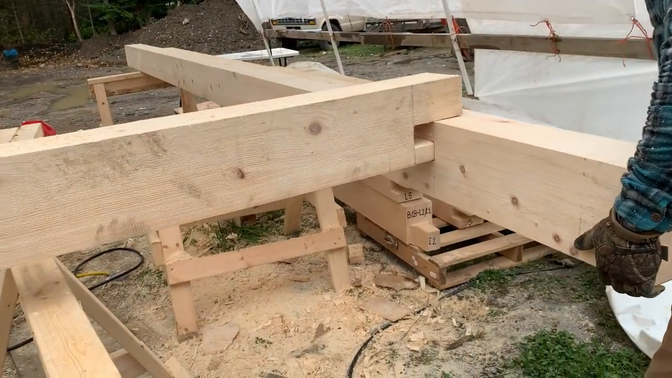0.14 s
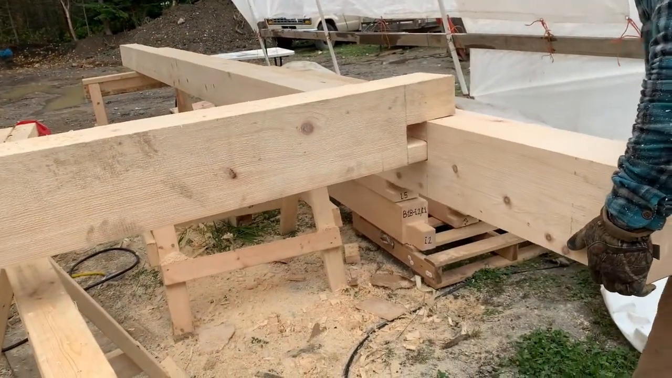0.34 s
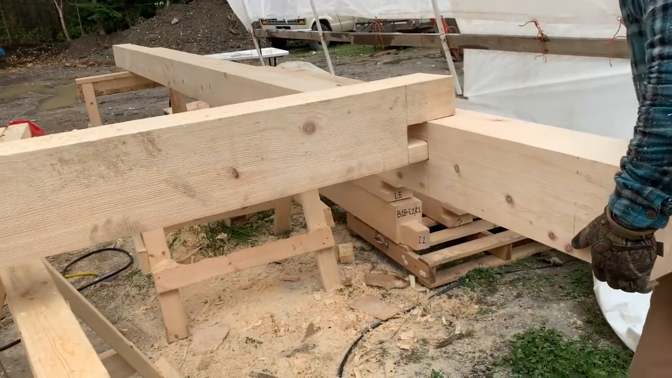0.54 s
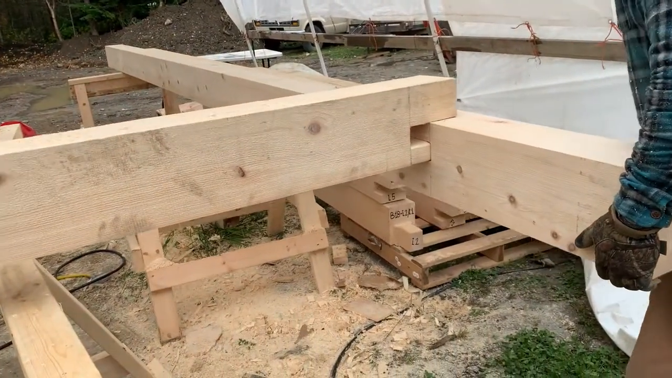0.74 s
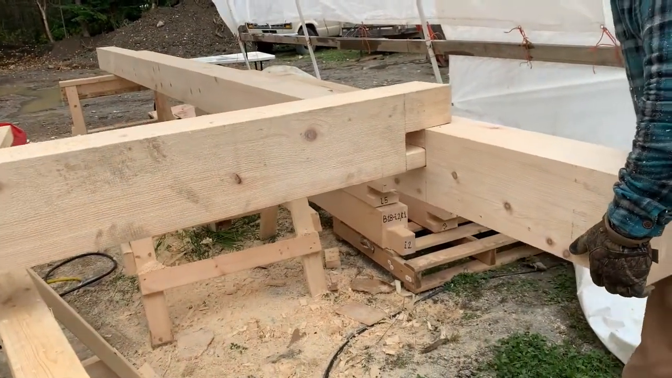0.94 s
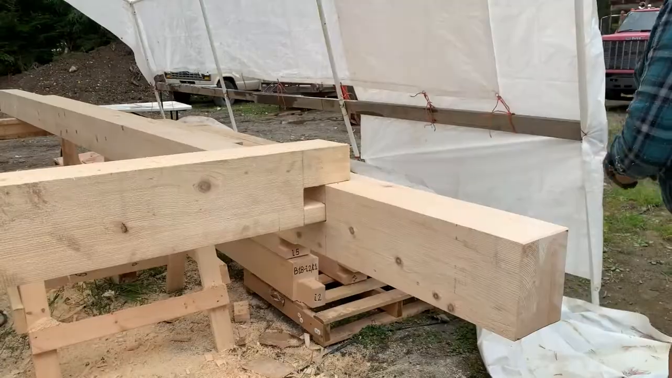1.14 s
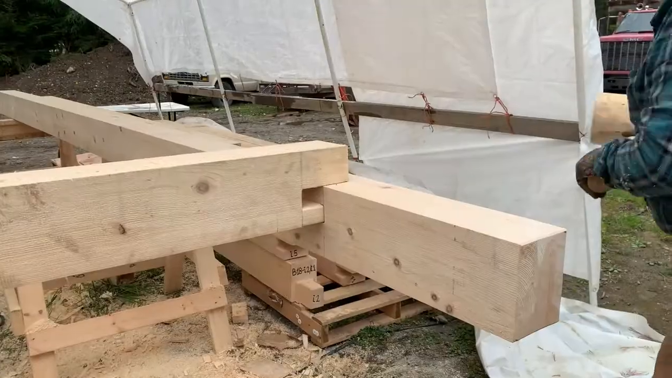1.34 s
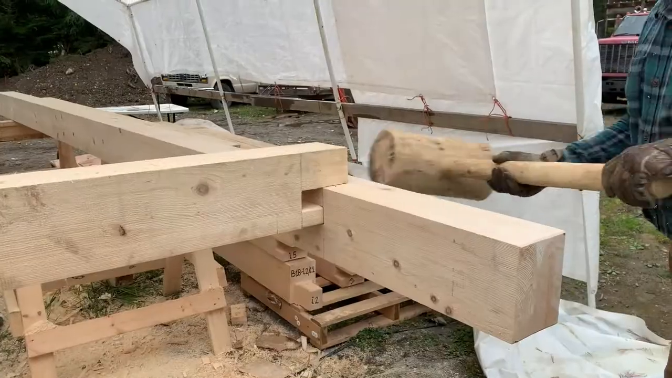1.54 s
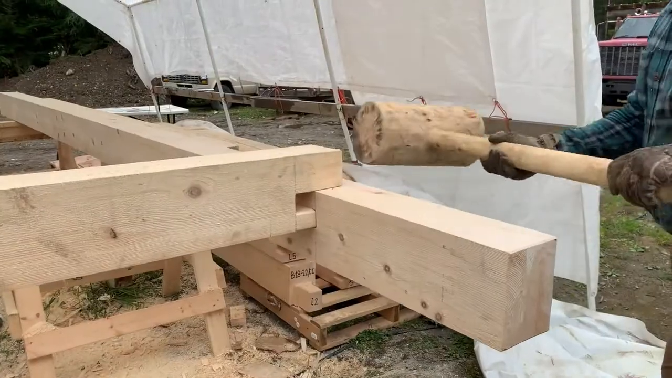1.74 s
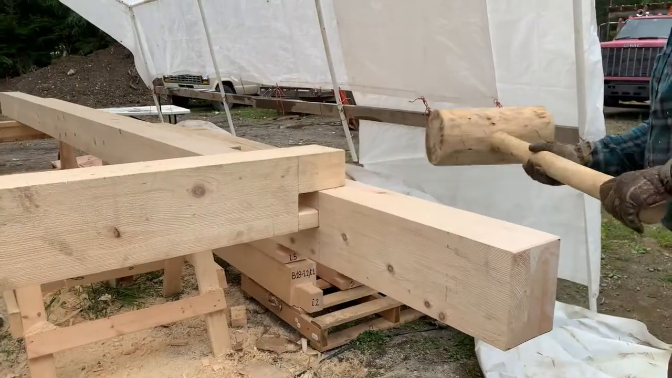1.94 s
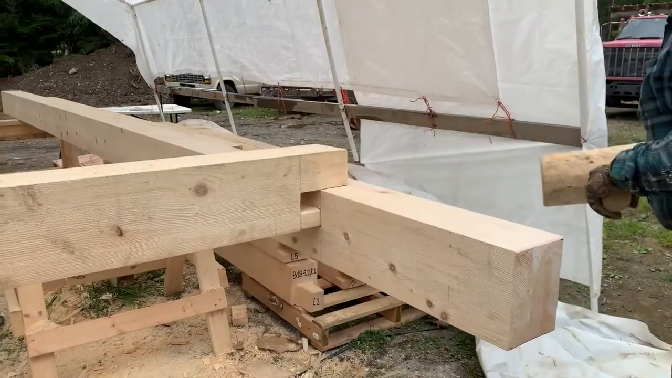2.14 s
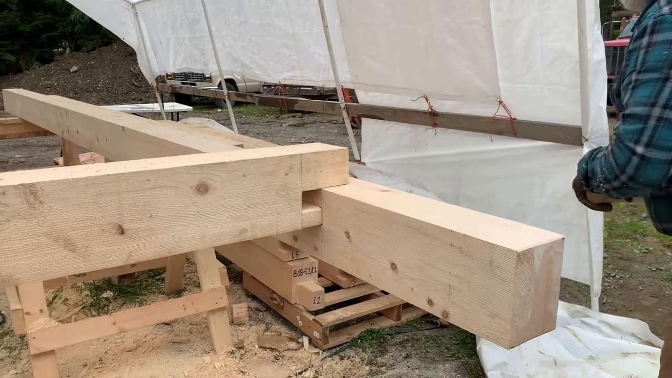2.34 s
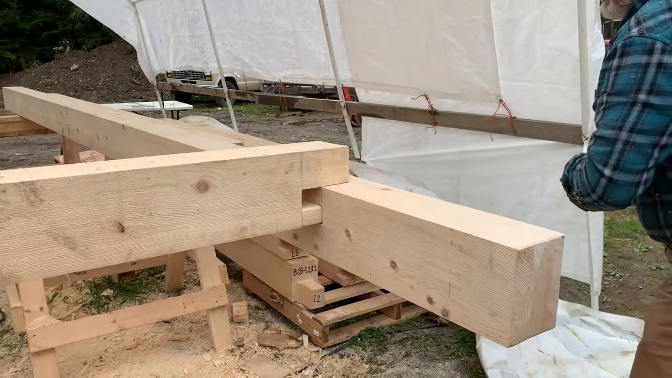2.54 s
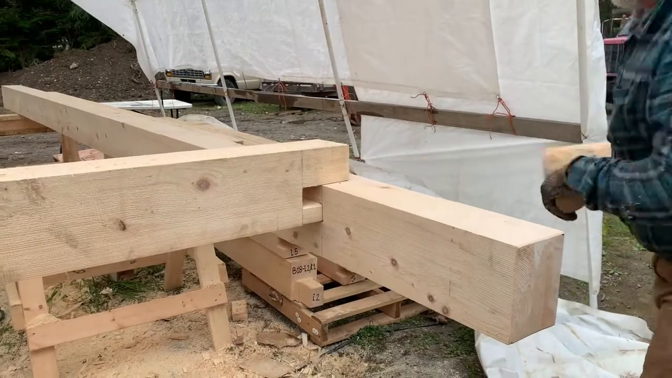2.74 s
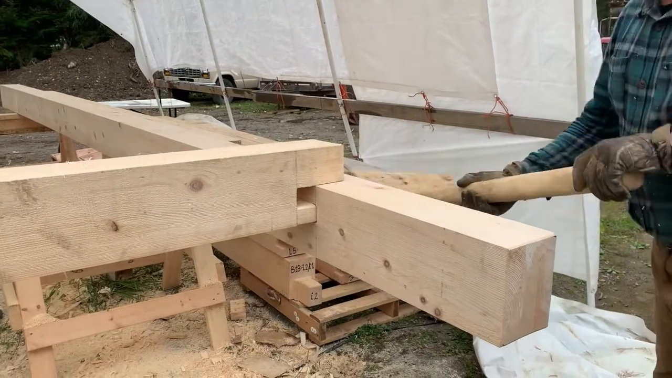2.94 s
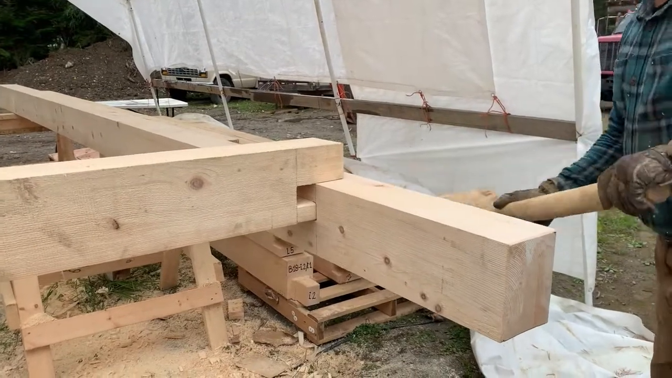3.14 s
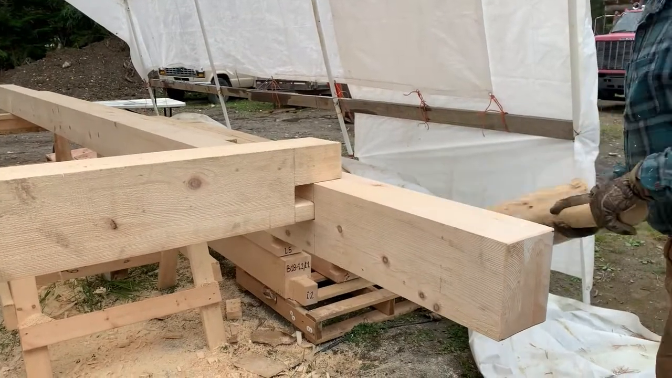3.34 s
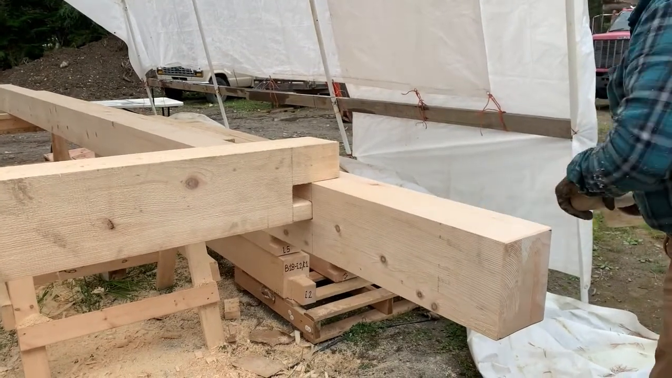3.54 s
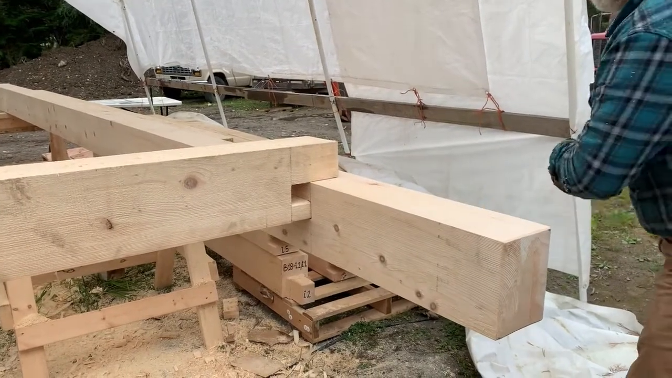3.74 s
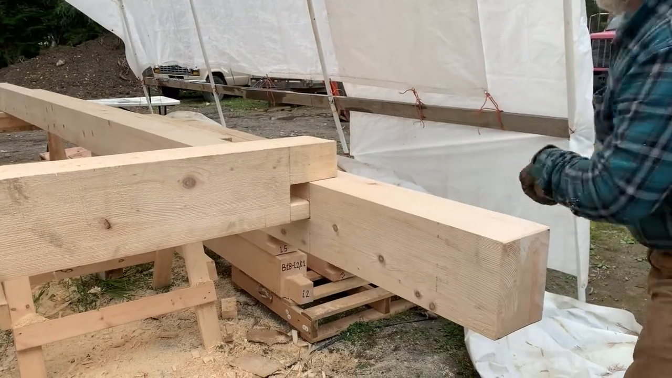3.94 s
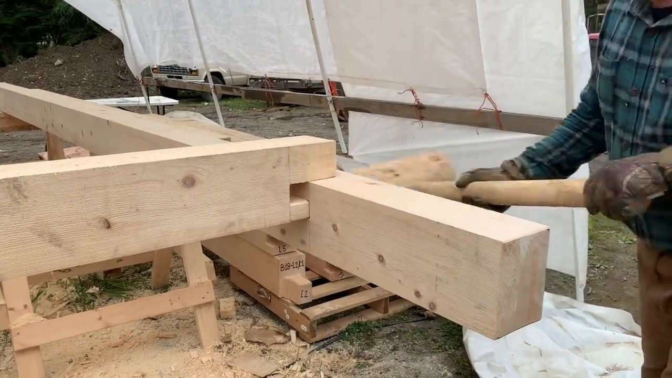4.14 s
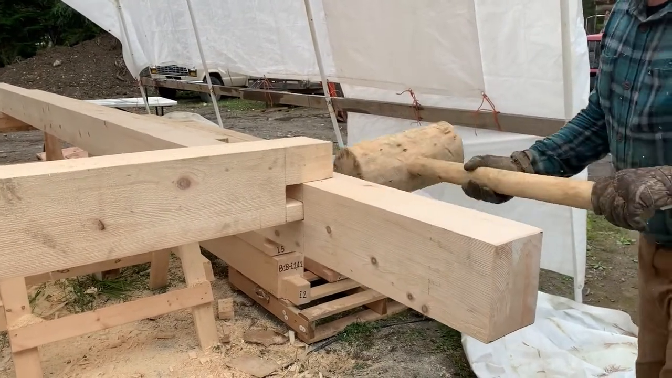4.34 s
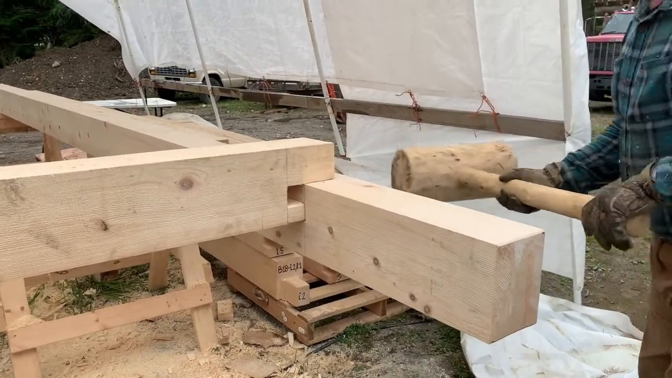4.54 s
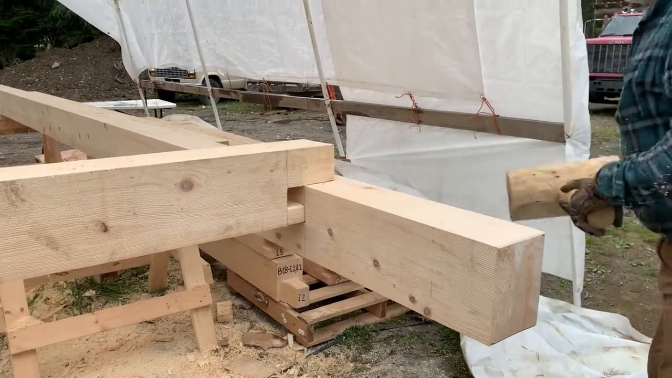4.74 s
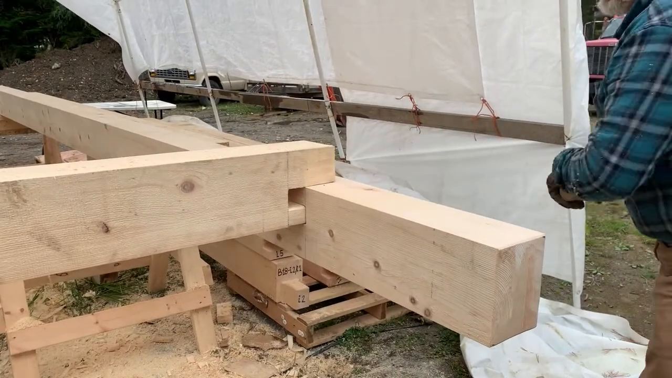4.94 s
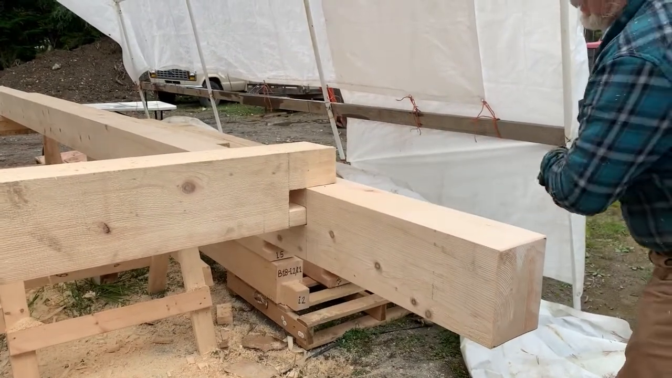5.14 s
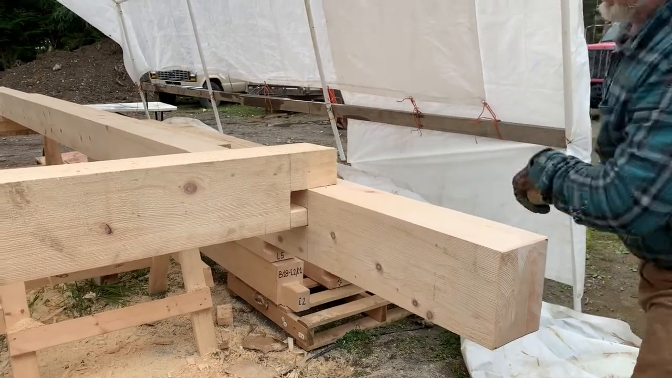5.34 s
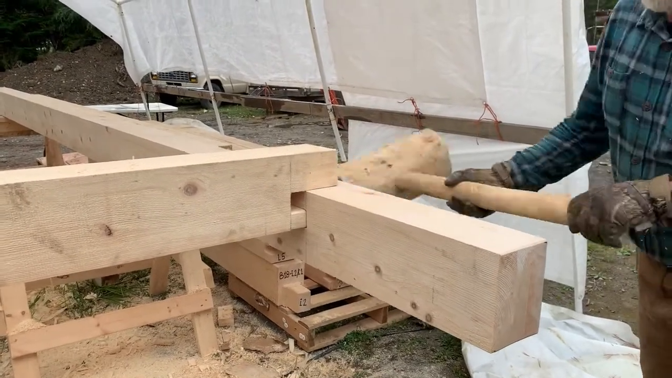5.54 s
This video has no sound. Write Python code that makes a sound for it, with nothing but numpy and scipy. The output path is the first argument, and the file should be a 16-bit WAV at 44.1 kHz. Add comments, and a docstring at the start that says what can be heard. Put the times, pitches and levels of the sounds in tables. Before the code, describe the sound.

Close, dry stereo sound of timber framing in an open tarpaulin shelter. From 0 to 1.07 s there is low handling rumble, small taps and scuffs, and two muted hollow bumps at about 0.57 and 0.87 s, the second softer. Everything cuts off abruptly at 1.07 s into a quieter view with faint rustle. Heavy mallet blows land at 1.59, 2.90, 4.17 and 5.54 s: each a hard woody knock around 200-600 Hz, quickly dropping in pitch, with a short crack, a low push and a brief hiss from cloth and boards, dying within a few tenths of a second. The first blow has the brightest crack; the last is cut short by the ending. Dry, clicking wood creaks follow the first blow, thicken from 2.6 to 2.9 s, continue to 3.26 s, then return weaker around 4.04-4.48 and 5.3-5.5 s. Between them it is nearly silent.

```python
"""A wooden mallet knocks a heavy beam into its joint under a tarpaulin shelter: two nudges by hand, then four blows.
Each knock is a short falling tone, a set of ringing sines, a crack, a slow push and a burst of hiss.
Something wooden creaks: chains of small rough clicks that set dry wood ringing.
Taps are short noise bursts; cloth and ground rustle below as bands of noise that come and go.
The shelter's returns are dying noise; two microphone ports and a limiter shape the end result."""
import sys
import numpy as np
from scipy import signal
from scipy.fft import rfft, irfft, next_fast_len
from scipy.io import wavfile
from scipy.ndimage import uniform_filter1d

SR = 44100
rng = np.random.default_rng(int(sys.argv[2]) if len(sys.argv) > 2 else 0)


def transcribe(u):
    """Save the signal u as a 16-bit wav file named by the first command-line argument.

    u: samples, shape (n,) or (channels, n), limited to [-1, 1]; the rate is SR.
    q: integer samples, one column per channel.
    """
    v = np.clip(np.atleast_2d(u).T, -1, 1)
    q = np.round(v * 32767).astype(np.int16)
    wavfile.write(sys.argv[1], SR, q)


N = 246078

# Slow background: t/s, dull rumble level/dB, bright rustle level/dB, deep rumble level/dB
BACKGROUND = [(0, -53, -61, -56), (.25, -54, -78, -61), (.5, -57, -65.5, -55.5), (1.06, -63, -71.5, -45.5),
              (1.08, -58, -60, -62.5), (1.45, -64.5, -63, -73.5), (1.97, -54.5, -81.5, -62.5),
              (2.5, -59, -67.5, -58.5), (3.35, -56.5, -72, -69.5), (3.94, -66.5, -82.5, -83),
              (4.55, -62.5, -75.5, -69.5), (4.8, -69, -83, -86.5), (5.3, -76, -93.5, -80.5),
              (5.58, -66, -46.5, -71)]
# Stirrings of frame and cloth: start t/s, hold/s, then dull, bright and deep level/dB
STIRS = [(0.072, 0.048, -50, -74, -45.5), (0.27, 0.022, -66, -71, -43.5), (0.552, 0.01, -47, -45, -66),
         (0.649, .04, -47.5, -86, -36.5), (.93, 0.27, -45, -64, -55.5), (1.31, 0.032, -54.5, -67, -53),
         (1.622, 0.16, -54.5, -58, -38.5), (1.747, 0.096, -39.5, -51, -40),
         (2.155, 0.017, -55.5, -58.5, -50), (2.625, .22, -46, -52, -59.5), (2.912, 0.068, -43, -63.5, -49),
         (3.066, 0.16, -44.5, -56, -49), (4.03, 0.11, -59, -57.5, -68.5), (4.173, 0.027, -40.5, -57, -47),
         (4.306, .13, -48.5, -62, -51.5), (5.373, .2, -55, -65, -66)]
# Colour of the dull and deep rumble: f/Hz, level/dB per Hz
RUMBLE_COLOUR = [(12, -55), (20, -19.5), (65, -24.5), (85, 0), (124, -1), (163, -9.5), (295, -3), (329, -4),
                 (439, -2), (555, -18), (608, -16), (728, -19), (1500, -23), (1950, -41), (3300, -120)]
# Colour of the bright rustle: f/Hz, level/dB per Hz
RUSTLE_COLOUR = [(410, -52), (700, 9.5), (1050, -24.5), (1580, -3), (1890, -8), (2050, -5.5), (3370, -17.5),
                 (7490, -23), (9730, -41), (12600, -32.5), (16000, -44)]
# Colour of the steady faint hiss: f/Hz, level/dB per Hz
FAINT_HISS_COLOUR = [(880, -32), (1500, -2), (3030, -6.5), (9470, -11.5), (12600, -16), (16000, -25)]
# Small taps and scuffs: t/s, peak level/dB, centre f/Hz, t60/s, treble level/dB
TAPS = [(.038, -40.5, 830, 0.035, -48), (0.133, -37.5, 790, 0.02, -26), (0.301, -38, 386, 0.091, -32),
        (.367, -41.5, 1590, 0.051, -19), (0.523, -28, 1080, 0.02, -22), (0.648, -32, 1500, 0.014, -25),
        (.715, -38.5, 890, 0.032, -32), (0.821, -34, 890, 0.032, -27), (0.989, -32, 1900, 0.05, -23),
        (1.035, -32, 1180, 0.12, -38), (1.049, -28, 930, 0.069, -45), (1.186, -45, 1060, 0.096, -10),
        (1.353, -39, 2303, 0.17, -8), (2.0956, -45.5, 607, 0.02, -30), (2.4088, -39.5, 463, 0.027, -24),
        (3.378, -55.5, 6580, 0.014, -7), (3.4267, -51, 5980, .01, -14)]
# Slips of the creak: t/s, level/dB
SLIPS = [(1.7035, -43), (1.7827, -38), (1.8218, -39.5), (1.8462, -30.5), (1.8771, -30), (2.1566, -49.5),
         (2.1948, -32), (2.4284, -32), (2.5939, -36), (2.6612, -27.5), (2.7032, -30.5), (2.7423, -31.5),
         (2.7865, -27.5), (2.831, -27), (2.878, -23.5), (3.051, -58.5), (3.1154, -50.5), (3.1618, -39),
         (3.2121, -40), (3.2622, -32.5), (4.038, -35), (4.0806, -41), (4.1146, -38.5), (4.36, -47),
         (4.395, -42.5), (4.4503, -49), (4.478, -43.5), (5.3014, -40), (5.3497, -50.5), (5.3964, -44),
         (5.449, -42), (5.515, -47)]
# Low, middle and top modes of the creaking wood: f/Hz, longest t60/s, level/dB, delay/s
CREAK_LOW = [(420, 0.04, -9, 0.0018), (642, .022, -11, 0.0012)]
CREAK_MID = [(1450, .009, 5.5, 0), (1750, .006, -1, .0008), (2150, .009, 4, .0038), (2600, .007, -1, .0035)]
CREAK_TOP = [(4092, 0.0035, -10.5, 0.0051), (5720, .004, -7.5, 0.0041), (6700, .004, -8.5, 0),
             (8300, .004, -6.5, 0), (12800, .003, -19.5, 0.0056)]
# Echoes of the creak from near timbers: delay/s, level/dB
CREAK_ECHOES = [(.0068, -14), (0.0153, -7.5), (.023, -17)]
# Knocks on the beam: t/s, ring level/dB, ring swell/ms, crack level/dB, crack brightness/(dB per octave),
# push level/dB, after-hiss level/dB, hiss rise/ms, first wave level/dB, its lead/ms, its starting f/Hz
KNOCKS = [(0.572, -23.5, 2.5, -46, -1, -36.5, -4, 9.5, -16, 3.6, 354.5),
          (0.866, -30.5, 0.88, -57, -10.5, -35, -13, 2.5, -23, 0.43, 804),
          (1.588, -17, 4.9, -17.5, 0.5, -7, 10, 0.83, 0.5, 0.15, 520.5),
          (2.901, -19.5, 2.1, -10, -3.5, -0.5, 7.5, 1.57, 1.5, 5.46, 599),
          (4.173, -17.5, 2.6, -13.5, -9.5, -5, 1.5, 1.6, -3, 5.6, 592.6),
          (5.5373, -22, 4.3, -9, -8, -24.5, 3.5, 5.9, 3.5, 0.4, 594)]
# Colour of the hiss after a knock: f/Hz, level/dB per Hz
AFTER_HISS_COLOUR = [(350, -30), (600, -22), (688, -7), (801, -1.5), (957, -32.5), (1160, -15),
                     (1980, -4.5), (2990, -22.5), (7830, -18.5), (16000, -47.5)]
# Modes of the mallet face: f/Hz, t60/s, level/dB
MALLET_MODES = [(1230, 0.013, 11), (1650, 0.013, 0.5), (1980, 0.019, -3.5), (2600, 0.008, 5),
                (4200, 0.0023, 9.5), (6430, 0.011, 3.5), (8820, 0.0099, 2), (10900, 0.013, -18)]
# Modes of the timber frame: f/Hz, longest t60/s, then level/dB in each of the six knocks
FRAME_MODES = [(64.4, 0.1, -15, -3, -9, -14.5, -11.5, 1.5), (85.8, 0.14, -13, -7.5, -25, -17, -28.5, -22.5),
               (130.4, 0.24, 6, 15.5, -6.5, -24, -18, -24), (188.2, 0.13, 6, 6, -3, 0, -6.5, -15),
               (236.4, 0.051, -11.5, 7, 15.5, 10.5, 15, 4.5), (256.8, 0.9, 1.5, -11, -9.5, -4, -17, -10.5),
               (300.7, 0.11, 11, 6.5, 13, 6.5, -6, 5.5), (358.3, 0.53, 0, 1.5, 4, 9.5, 2, -5.5),
               (411, .19, -6, -1.5, -3.5, -12.5, -0.5, -2), (425, 0.14, -9.5, -11, 9.5, 1.5, -5.5, -16.5),
               (496.8, 0.059, -1, 1, 13.5, -9, -0.5, 9.5), (488, .24, -18, -5, -17, -24.5, -14, -31.5),
               (581.3, 0.1, -6.5, 10, 2.5, -10.5, -16.5, -15),
               (676, 0.15, -20, -27, -27.5, -10, -6.5, 12.5), (826, 0.088, -24, 9.5, -34.5, 8.5, -4, -40),
               (893, 0.027, -6.5, 7, -41, 2.5, -15, 10), (1100, .18, -15, -13, -53.5, -35, -20, -42),
               (1205, .12, -24, -10, -15.5, -13, -23, -52), (1220, .13, -10, -49, -59, -24, -25.5, -23),
               (1680, 0.27, -36, -16, -34, -16.5, -17.5, -24), (1862, 0.086, -32, -28, -27, -20, -24.5, -3)]
# How long sound lasts in the shelter, before each use stretches it: f/Hz, t60/s
SHELTER_T60 = [(100, 0.45), (500, 0.29), (2000, 0.1), (6000, 0.079), (14000, 0.17)]
# How alike left and right noise are: f/Hz, likeness (1 = the same)
LIKENESS = [(60, .97), (500, .8), (1200, .4), (5000, .2), (8000, .92), (13000, .7), (15500, .4)]
# Phase between the microphone ports: f/Hz, left lead before the sudden stop/rad, left lead after it/rad
PORT_PHASE = [(20, .3, -.2), (700, .5, -.45), (1500, 1.5, -1.2), (2400, 2.5, -2.2), (3800, .2, .2),
              (5000, 1.1, 1.1), (6500, .1, .1), (9500, 3.1, 3.1), (13000, 6.3, 6.3), (14200, 6.5, 6.5),
              (16000, 9.4, 9.4)]
# Level between the microphone ports: f/Hz, left minus right level/dB
PORT_BALANCE = [(60, -1), (110, -0.5), (200, 3.5), (380, 2), (700, -2), (1290, -0.5), (2380, -2),
                (4400, 3.5), (8120, 2), (15000, 4)]

BAND_EDGES_HZ = 22 * 2 ** np.arange(0, 9.7, .5)   # half-octave steps
SUDDEN_STOP_S = 1.068   # the viewpoint changes: tails are cut off and the port phases change
FAINT_HISS_DB = -100.5
STIR_RISE_DB_PER_S, STIR_FALL_DB_PER_S = 300.5, 154
STIR_RISE_S = .04   # a stirring reaches its top this long after its start
SLIP_CHANGE_DB = 1.5   # how much a mode's strength differs from slip to slip
HISS_FOLLOWS = .5   # share of the crack's brightness that the after-hiss takes over
SPREAD_MS = 13   # sets how far low modes lag behind high ones
PITCH_AT_CRACK, PITCH_AT_END = .95, .42   # first wave: share of its starting pitch at the crack and 8 ms later
LIMIT_DB, RELEASE_DB_PER_S = -.5, 250
CEILING = 1.6   # soft clipping bends towards this height
CUTOFF_HZ = 16700   # from here up, 80 dB down


def from_db(db):
    """Gain of a level."""
    return 10 ** (np.asarray(db) / 20)


def rms_one(x):
    """Scaled to rms 1."""
    return x / np.sqrt(np.mean(x ** 2) + 1e-20)


def at_hz(points, hz):
    """A table read between its points, on a log-frequency axis."""
    table = np.array(points)
    return np.interp(np.log(hz), np.log(table[:, 0]), table[:, 1])


def smooth(x, hz, order=1):
    """Treble above hz is softened."""
    return signal.lfilter(*signal.butter(order, hz, fs=SR), x)


def without_bass(x, hz, order=1):
    """Bass below hz is softened."""
    return signal.lfilter(*signal.butter(order, hz, "high", fs=SR), x)


def band(x, low_hz, high_hz):
    """Only the stretch between two frequencies is left, with gentle edges."""
    return signal.lfilter(*signal.butter(1, [low_hz, high_hz], "band", fs=SR), x)


def add(out, s, sound):
    """Mixes a sound in at s; early sounds end at the sudden stop."""
    at = round(s * SR)
    stop = round(SUDDEN_STOP_S * SR) if s < SUDDEN_STOP_S else N
    end = min(at + sound.shape[-1], stop)
    out[..., at:end] += sound[..., :end - at]


def drift(rate_hz):
    """Slow random wandering of spread 1, worked out at every 40th sample and joined by lines."""
    r = np.exp(-80 * np.pi * rate_hz / SR)
    slow = signal.lfilter([1], [1, -2 * r, r * r], rng.standard_normal(N // 40 + 2002))[2000:]
    return np.interp(np.arange(N) / 40, np.arange(len(slow)), rms_one(slow))


def clicks(seconds, levels_db):
    """A train of single-sample clicks."""
    out = np.zeros(N)
    at = np.round(np.asarray(seconds) * SR).astype(int)
    inside = at < N
    np.add.at(out, at[inside], from_db(levels_db)[inside])
    return out


def ring(struck, hz, t60):
    """Each unit click sets a dying sine of height 1 ringing."""
    r, w = from_db(-60 / (t60 * SR)), 2 * np.pi * hz / SR
    return signal.lfilter([0, np.sin(w)], [1, -2 * r * np.cos(w), r * r], struck + 1e-18)


def banded_noise(shape, size, low_hz=20, top_hz=20000):
    """Half-octave bands of stereo noise; shape(hz) is the gain of a band over time."""
    out, white = 0, rng.standard_normal((2, 2, size))
    for k, (low, high) in enumerate(zip(BAND_EDGES_HZ, BAND_EDGES_HZ[1:])):
        hz = np.sqrt(low * high)
        if low_hz < hz < top_hz:
            sos = signal.butter(2, [low, high], "band", fs=SR, output="sos")
            mid, side = signal.sosfilt(sos, white[k % 2])
            alike = at_hz(LIKENESS, hz)
            # the side part has opposite signs on left and right
            stereo = np.sqrt(1 + alike) * mid + np.sqrt(1 - alike) * side * [[1], [-1]]
            out = out + shape(hz) * stereo
    return out


def dying(spectrum, stretch, rise_ms=1):
    """Stereo noise of energy 1 that dies band by band like the shelter."""
    t = np.arange(SR // 3) / SR

    def fade(hz):
        return from_db(at_hz(spectrum, hz) - 60 * t / (stretch * at_hz(SHELTER_T60, hz)))

    tail = banded_noise(fade, size=len(t))
    tail = tail * (1 - np.exp(-1000 * t / max(rise_ms, .1)))
    return tail / np.sqrt(np.sum(tail ** 2) / 2)


def spread(x, tail):
    """A mono sound smeared by a stereo tail, separately before and after the sudden stop."""
    out, stop = np.zeros((2, N)), round(SUDDEN_STOP_S * SR)
    add(out, 0, signal.fftconvolve(x[None, :stop], tail, axes=1))
    add(out, SUDDEN_STOP_S, signal.fftconvolve(x[None, stop:], tail, axes=1))
    return out


def background_and_stirs():
    """Gains of the dull, bright and deep layers: a slow background plus stirrings that rise, hold and fall."""
    t, (s, *levels_db) = np.arange(N) / SR, np.transpose(BACKGROUND)
    power = from_db([np.interp(t, s, db) for db in levels_db]) ** 2
    for start, hold, *top_db in STIRS:
        full = start + STIR_RISE_S
        rise_db = STIR_RISE_DB_PER_S * np.maximum(full - t, 0)
        fall_db = STIR_FALL_DB_PER_S * np.maximum(t - full - hold, 0)
        heard = (t < SUDDEN_STOP_S) | (start > SUDDEN_STOP_S)
        power = power + heard * from_db(np.array(top_db)[:, None] - rise_db - fall_db) ** 2
    return np.sqrt(power)


def rustle():
    """A patchy dull rumble, its deepest part on its own, a brighter, grainier rustle, and a steady faint hiss."""
    dull_gain, bright_gain, deep_gain = background_and_stirs()
    together = drift(51)      # the bright bands share this flicker
    deep = banded_noise(lambda hz: from_db(at_hz(RUMBLE_COLOUR, hz) + 2.5 * drift(8)), size=N, top_hz=170)
    dull = banded_noise(lambda hz: from_db(at_hz(RUMBLE_COLOUR, hz) + 2.2 * drift(15)),
                        size=N, low_hz=170, top_hz=2500)
    bright = banded_noise(lambda hz: from_db(at_hz(RUSTLE_COLOUR, hz) + 0.68 * drift(4) + 1.4 * together),
                          size=N, low_hz=500)
    hiss = banded_noise(lambda hz: from_db(at_hz(FAINT_HISS_COLOUR, hz)), size=N, low_hz=3000)
    out = deep_gain * rms_one(deep) + dull_gain * rms_one(dull) + bright_gain * rms_one(bright)
    return out + from_db(FAINT_HISS_DB) * rms_one(hiss)


def taps():
    """Short noise bursts through a broad resonance, with a little treble."""
    out, t = np.zeros(N), np.arange(SR // 5) / SR
    for s, db, hz, t60, treble_db in TAPS:
        attack = np.minimum(t / (0.039 * t60), 1)
        burst = rng.standard_normal(len(t)) * from_db(-60 * t / t60) * attack
        body = smooth(band(burst, hz / 1.4, hz * 1.4), hz)
        treble = band(burst, 2500, 7000)
        sound = rms_one(body) + from_db(treble_db) * rms_one(treble)
        add(out, s, from_db(db) * sound / np.abs(sound).max())
    return out


def creak():
    """Each slip is a rough little tear that rings the same dry wood and comes back from the nearest timbers."""
    s, db = np.transpose(SLIPS)
    grit, direct = rng.standard_normal(N), 0
    modes = CREAK_LOW + CREAK_MID + CREAK_TOP
    changes_db = SLIP_CHANGE_DB * rng.standard_normal((len(s), len(modes)))
    for (hz, t60, mode_db, late), change_db in zip(modes, changes_db.T):
        starts = clicks(s + late, db + mode_db + change_db)
        fade = signal.lfilter([1], [1, -np.exp(-1 / (.002 * SR))], starts + 1e-18)      # dies within a few ms
        tear = starts + .12 * grit * fade
        ringing = ring(tear, hz, min(t60, 16 / hz))      # dry wood: t60 of sixteen cycles at most
        direct = direct + smooth(ringing, min(1.5 * hz, 18000), order=2)      # a soft start
    out = direct.copy()
    for delay, echo_db in CREAK_ECHOES:
        lag = round(delay * SR)
        out[lag:] += from_db(echo_db) * direct[:-lag]
    return without_bass(out, 250, order=2)      # the creak keeps nothing deep below about 250 Hz


def after_hiss():
    """Tarpaulin and loose boards hiss for a moment after each knock, brighter after a brighter crack."""
    out = np.zeros((2, N))
    for s, _, _, _, tilt_db, _, db, rise_ms, *_ in KNOCKS:
        colour = []
        for hz, level in AFTER_HISS_COLOUR:
            octaves_up = max(np.log2(hz / MALLET_MODES[0][0]), 0)
            colour.append((hz, level + HISS_FOLLOWS * tilt_db * octaves_up))
        add(out, s, from_db(db) * dying(colour, stretch=1.1, rise_ms=rise_ms))
    return out


def frame_ring():
    """Bending waves run slower the lower they are, so low modes start later; each swells up."""
    out, t = np.zeros(N), np.arange(SR // 2) / SR
    for place, (s, db, swell_ms, *_) in enumerate(KNOCKS):
        for k, (hz, t60, *mode_db) in enumerate(FRAME_MODES):
            late = np.maximum(t - SPREAD_MS / 1000 * (np.sqrt(600 / hz) - .6), 0)
            t60 = min(t60, .03 + 850 / hz ** 1.5)      # wood damps its higher modes sooner
            swell = 1 - np.exp(-late * 1000 / max(swell_ms, .1))
            gain = from_db(db + mode_db[place] - 60 * late / t60)
            sign = (-1) ** k      # every other mode starts downwards
            add(out, s, sign * gain * swell * np.sin(2 * np.pi * hz * late))
    return out


def beam_push():
    """The whole beam lurches once after each knock, a slow push of air."""
    s, push_db = np.transpose(KNOCKS)[[0, 5]]
    t = np.arange(SR // 50) / SR
    bump = np.exp(-.5 * ((t - .0085) / .0015) ** 2)
    push = np.convolve(clicks(s, push_db), bump)[:N]
    return without_bass(push, 22)      # the air springs back


def mallet_crack():
    """The face of the mallet snaps: short high modes, tilted brighter or duller from knock to knock."""
    s, crack_db, tilt_db = np.transpose(KNOCKS)[[0, 3, 4]]
    out = np.zeros(N)
    for hz, t60, db in MALLET_MODES:
        octaves_up = np.log2(hz / MALLET_MODES[0][0])
        out += ring(clicks(s, crack_db + db + tilt_db * octaves_up), hz, t60)
    return out


def first_wave():
    """The wave in the wood outruns the crack in the air: a weak forerunner, then a packet of falling pitch."""
    out, ms = np.zeros(N), np.arange(-SR // 40, SR // 40) * 1000 / SR      # 0 ms is the crack
    for s, *_, db, lead_ms, start_hz in KNOCKS:
        hz = start_hz * np.interp(ms, [-lead_ms, 0, 8], [1, PITCH_AT_CRACK, PITCH_AT_END])
        since = ms + lead_ms      # time since the packet begins
        fade_in, fade_out = np.clip((since + 10) / 7, 0, 1), np.clip(-(since - 1.2) / 1.2, 0, 1)
        forerunner = .25 * np.clip(lead_ms / 6.5, .25, 1) * fade_in * fade_out
        packet = np.clip(since / 1.2, 0, 1) * np.interp(ms, [-1, 2], [.6, 1])
        shape = (forerunner + packet) * np.exp(-.5 * (np.maximum(ms - 5, 0) / 2.2) ** 2)
        phase = 2 * np.pi * np.cumsum(hz) / SR
        tone = np.sin(phase - phase[len(ms) // 2])
        grit = rms_one(band(rng.standard_normal(len(ms)), 1000, 3000))
        add(out, s + ms[0] / 1000, from_db(db) * shape * (tone + from_db(-28) * grit))
    return out


def scene():
    """Dry sources, their returns from the shelter, the after-hiss and the rustle."""
    slips = creak() + taps()
    knocks = frame_ring() + beam_push() + mallet_crack() + first_wave()
    walls = [(30, -25.5), (300, 5.0), (3000, 0.0), (15000, 0.5)]   # f/Hz, level/dB
    returns = from_db(-13) * spread(knocks, dying(walls, stretch=.5, rise_ms=18))
    returns += from_db(-7.5) * spread(slips, dying(walls, stretch=.7, rise_ms=6))
    return rustle() + after_hiss() + returns + slips + knocks


def record(dry):
    """Two microphone ports differ in phase and level; a limiter holds the blows down, the top is cut."""
    size = next_fast_len(N + 4096)
    hz = np.maximum(np.arange(size // 2 + 1) * SR / size, 1)
    table_hz, *phases = np.transpose(PORT_PHASE)
    spectrum, versions = rfft(dry, size), []
    for phase in phases:
        # each port takes half of the difference
        half = from_db(at_hz(PORT_BALANCE, hz) / 2) * np.exp(.5j * np.interp(hz, table_hz, phase))
        versions.append(irfft(spectrum * [half, 1 / half], size)[:, :N])
    early, late = versions
    ports = np.where(np.arange(N) < SUDDEN_STOP_S * SR, early, late)

    loudest = np.abs(ports).max(axis=0)
    over_db = np.maximum(20 * np.log10(loudest + 1e-9) - LIMIT_DB, 0)
    ramp = RELEASE_DB_PER_S * np.arange(N) / SR
    held_db = np.maximum.accumulate(over_db + ramp) - ramp      # lets go at a steady rate
    held_db = uniform_filter1d(held_db, size=44, origin=-21)      # looks a millisecond ahead
    limited = CEILING * np.tanh(ports * from_db(-held_db) / CEILING)
    return signal.sosfilt(signal.cheby2(20, 80, CUTOFF_HZ, fs=SR, output="sos"), limited)


dry = scene()
out = record(dry)
transcribe(out)
```